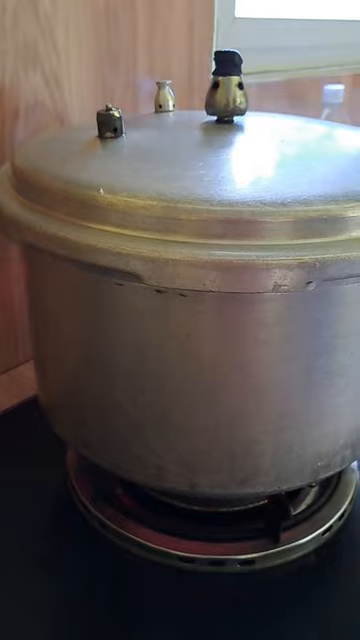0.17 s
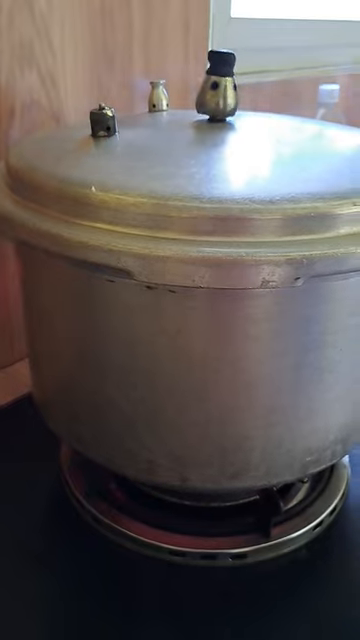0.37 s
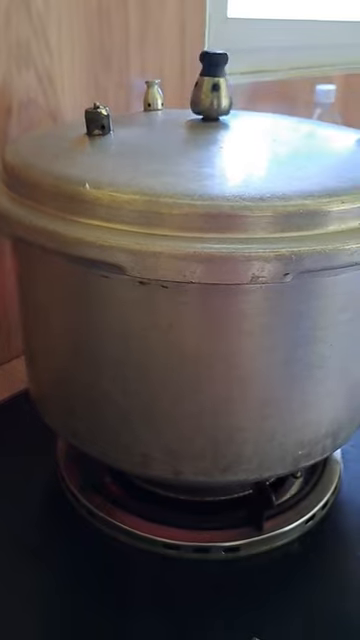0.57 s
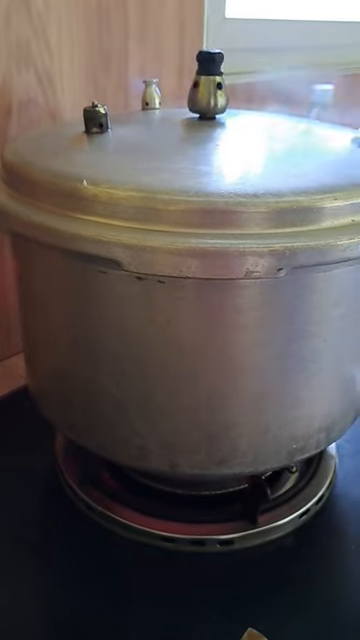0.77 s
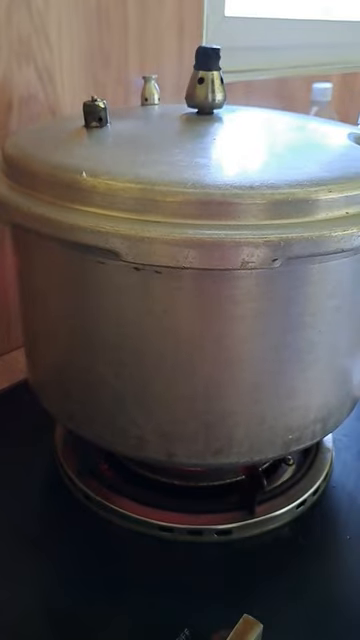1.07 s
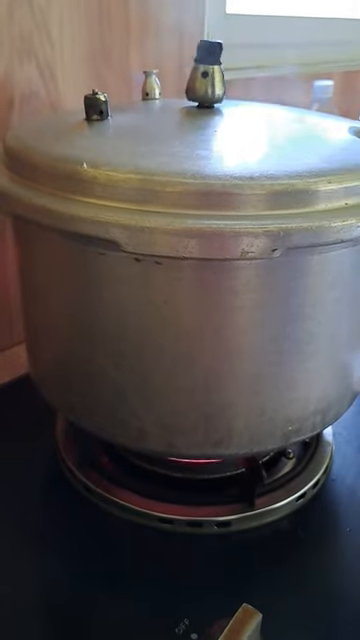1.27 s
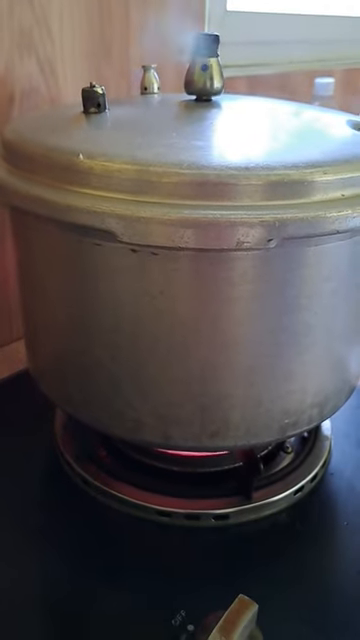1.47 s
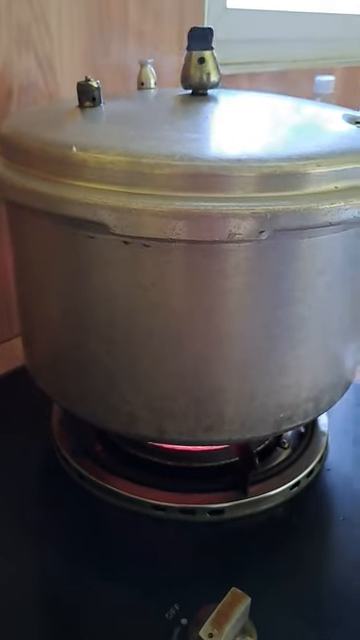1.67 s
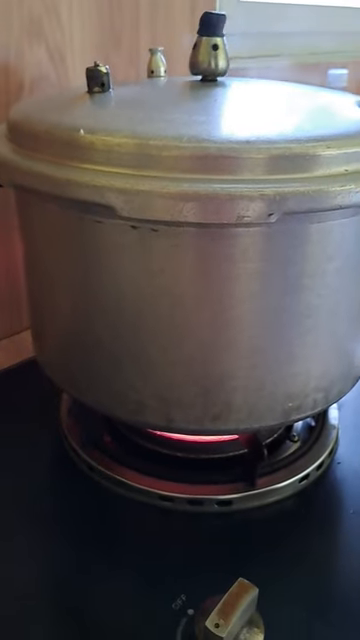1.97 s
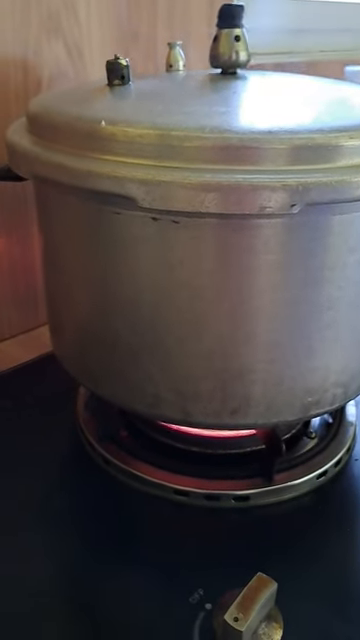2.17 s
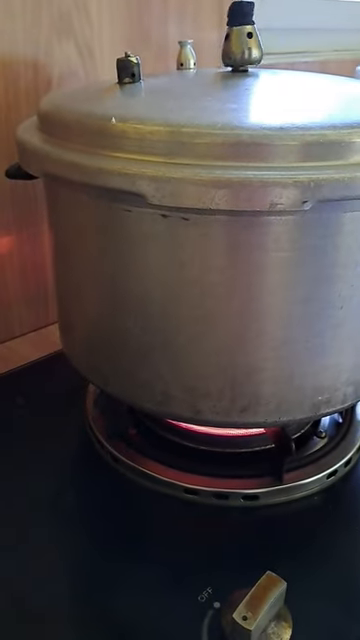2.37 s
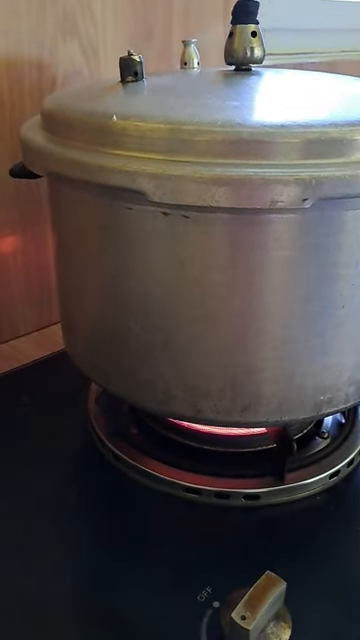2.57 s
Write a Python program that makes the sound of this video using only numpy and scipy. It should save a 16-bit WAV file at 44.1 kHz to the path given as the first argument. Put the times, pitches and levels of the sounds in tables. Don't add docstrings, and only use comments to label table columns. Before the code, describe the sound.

A pressure cooker vents bright, airy steam close to a stereo microphone. Broad overlapping puffs become shorter, more distinct spurts over a constant leak, with short kitchen reflections and a very quiet low burner rumble and appliance hum.

```python
import sys
import numpy as np
from scipy import signal
from scipy.fft import rfft, irfft
from scipy.io import wavfile

SR = 44100
rng = np.random.default_rng(int(sys.argv[2]) if len(sys.argv) > 2 else 0)


def wrap_up_sound(samples):
    columns = np.atleast_2d(samples).T
    tamed = np.clip(columns, -1, 1)
    steps = np.round(tamed * 32767).astype(np.int16)
    wavfile.write(sys.argv[1], SR, steps)


def to_linear_factor(level_db):
    exponent = np.asarray(level_db, float) / 20
    return 10 ** exponent


N = 120393
HZ = np.maximum(np.fft.rfftfreq(N, 1 / SR), 10)

# centre_s, level_db, half_length_s, aim (-1 away .. 1 toward), vent_ring_db
PUFFS = [(0.005, -26, 0.088, 0, -3), (0.237, -25, 0.07, 0.33, 1), (0.362, -24, 0.062, -0.22, -3),
         (0.543, -22, 0.04, 0.24, 2.5), (0.599, -20.5, 0.044, -0.33, 0.8), (0.781, -21, 0.035, 0.46, 1),
         (0.871, -23.5, 0.038, 0.1, -1.5), (0.952, -28, 0.051, 0.4, 1.5), (1.083, -20.5, 0.026, 0.43, 1.5),
         (1.149, -23, 0.028, -0.2, -5), (1.332, -18.5, 0.026, 0.2, 2), (1.443, -26, 0.018, 0.6, 3.5),
         (1.581, -22.5, 0.03, .2, 1), (1.647, -29.5, 0.031, 0.6, 5), (1.79, -23.5, 0.028, 0.61, 5),
         (1.84, -23.5, 0.041, 0.02, -3), (2.041, -20, 0.029, 0.58, 4.5), (2.172, -25.5, 0.035, 0.76, 2.5),
         (2.293, -21.5, 0.032, 0.72, 1.5), (2.363, -23, 0.022, 0.43, -3), (2.491, -20, 0.017, 0.7, -5),
         (2.527, -21.5, 0.033, -0.25, -1.5), (2.595, -22, 0.027, -0.1, -2), (2.74, -26, 0.034, 0.7, 1)]
# pitch_hz, level_db per Hz
JET_SPECTRUM = [(300, -31), (900, -20.5), (2650, -13.5), (5800, -4.5), (7700, 0.7), (9800, -7.5),
                (12300, 0), (15400, -1.5)]
# pitch_hz, left_minus_right_db
JET_BALANCE = [(700, 1), (2400, -3), (5500, -2.5), (7600, -2.5), (10000, 8), (12500, 3.5), (15500, 0.5)]
# pitch_hz, level_db at full aim
AIM_TILT = [(800, -6), (4000, -2.5), (8000, -2.5), (13000, 0.5)]
# pitch_hz, left_minus_right_db at full aim
AIM_PAN = [(2000, 7), (8000, 1), (14000, 9.5)]
# pitch_hz, share (0 .. 1)
DIRECT_SHARE = [(300, .7), (800, 0.45), (1500, 0.6), (2000, 0.25), (3500, 0.12), (4500, 0.22), (7400, 0.45),
                (15000, 0.12)]
# pitch_hz, share (0 .. 1)
ROOM_SHARE = [(800, 0.83), (4000, 0.3), (14000, 0.2)]
# pitch_hz, level_db per Hz
FLAME_SPECTRUM = [(25, -10), (80, -12.5), (115, -5.5), (165, -9.5), (215, -0.3), (260, -8), (450, -7.5),
                  (900, -26)]
# pitch_hz, likeness (0 .. 1)
FLAME_ALIKE = [(50, .45), (150, 0.73), (300, 0.7), (700, 0.13)]
# pitch_hz, level_db, width_hz
HUM_TONES = [(152, -60, 3.2), (468, -63.5, 1.1), (300.3, -70, 4), (225.6, -64.5, 2.8), (211.6, -62.5, 10),
             (180, -71.5, 4.4), (375.6, -70.5, 3)]


def rms_one(x):
    return x / np.sqrt(np.mean(x ** 2))


def at_hz(points, hz):
    pitch_hz, value = np.array(points).T
    return np.interp(np.log(hz), np.log(pitch_hz), value)


def drift(per_s):
    r = np.exp(-2 * np.pi * per_s / SR)
    settle = 8000
    noise = rng.standard_normal(N + settle)
    return rms_one(signal.lfilter([1], [1, -2 * r, r * r], noise)[settle:])


def colour(x, gain):
    return irfft(rfft(x) * gain, N)


def valve():
    leak_power, leak_aim = to_linear_factor(2 * -29.5), 0.11
    centre_s, level_db, half_s, aim, ring_db = np.array(PUFFS).T[:, :, None]
    t = np.arange(N) / SR
    power = to_linear_factor(2 * level_db) * np.exp(-((t - centre_s) / half_s) ** 2)
    total = power.sum(axis=0) + leak_power
    mean_aim = ((power * aim).sum(axis=0) + leak_power * leak_aim) / total
    mean_ring_db = (power * ring_db).sum(axis=0) / total
    return total, mean_aim, mean_ring_db


def lid():
    width_hz, level_db, waver_db, waver_per_s = 170, 3.0, 4.0, 3.0
    rings = 0
    for hz in (2330, 2580, 2800):
        ring = colour(rng.standard_normal(N), np.exp(-((HZ - hz) / width_hz) ** 2))
        rings = rings + rfft(ring * to_linear_factor(level_db + waver_db * drift(waver_per_s)))
    return rings * [[1], [-1]]


def echoes():
    echo_db, t60_s, start_s = -9, 0.15, 0.008
    t = np.arange(N) / SR
    tail = rng.standard_normal((2, N)) * to_linear_factor(-60 * t / t60_s) * (t > start_s)
    tail *= to_linear_factor(echo_db) / np.sqrt(np.sum(tail[0] ** 2))
    return (1 + rfft(tail)) / np.sqrt(1 + to_linear_factor(2 * echo_db))


def jet_noise():
    lag_s = 10 / 44100
    alike = np.clip(at_hz(DIRECT_SHARE, HZ), 0, 1)
    white = rfft(rng.standard_normal((3, N)))
    shared = white[0] * np.sqrt(alike)
    separate = white[1:] * np.sqrt(1 - alike)
    return separate + shared * np.exp(-2j * np.pi * HZ * [[0], [lag_s]])


def steam():
    room_t60_s, vent_hz, vent_octaves = 0.35, 8500, 0.14
    power, aim, ring_db = valve()
    keep = to_linear_factor(-120 / (room_t60_s * SR))
    sputter_db = 0.05 * drift(1900) + 0.57 * drift(34)
    source = jet_noise() + lid()
    out, step = 0, 1 / 3
    for hz in 250 * 2 ** np.arange(0, 6.2, step):
        octaves_off = np.clip(np.log2(HZ / hz) / step, -1, 1)
        band = irfft(source * np.cos(np.pi / 2 * octaves_off) ** 2, N)
        near = np.log2(hz / vent_hz) / vent_octaves
        fresh_db = aim * at_hz(AIM_TILT, hz) + ring_db * np.exp(-near ** 2 / 2)
        fresh = power * to_linear_factor(2 * fresh_db)
        linger = signal.lfilter([1 - keep], [1, -keep], fresh, zi=[fresh[0] * keep])[0]
        share = np.clip(at_hz(ROOM_SHARE, hz), 0, 1)
        pan = to_linear_factor(aim * at_hz(AIM_PAN, hz) * [[1], [-1]])
        direct = (1 - share) * fresh * pan * to_linear_factor(2 * sputter_db)
        level = np.sqrt(direct + share * linger)
        out = out + band * level * to_linear_factor(1.62 * drift(7.2))
    gain_db = at_hz(JET_SPECTRUM, HZ) + at_hz(JET_BALANCE, HZ) * [[0.5], [-0.5]] + 7.5
    return colour(out, to_linear_factor(gain_db) * echoes())


def flame():
    level_db, flicker_db, flicker_per_s = -58, 3, 3.6
    mid, side = rfft(rng.standard_normal((2, N)))
    alike = np.clip(at_hz(FLAME_ALIKE, HZ), 0, 1)
    both = np.sqrt(1 + alike) * mid + np.sqrt(1 - alike) * side * [[1], [-1]]
    roar = irfft(both * to_linear_factor(at_hz(FLAME_SPECTRUM, HZ)) / (1 + (HZ / 1200) ** 4), N)
    return rms_one(roar) * to_linear_factor(level_db + flicker_db * drift(flicker_per_s))


def hum():
    t = np.arange(N) / SR
    out = 0
    for hz, level_db, width_hz in HUM_TONES:
        strength = to_linear_factor(level_db + 0.5 + 2.2 * drift(width_hz))
        out = out + strength * np.sin(2 * np.pi * hz * t + 0.55 * drift(width_hz))
    return out


def scene():
    return steam() + flame() + hum()


def top_cut(x):
    return signal.sosfilt(signal.butter(12, 15900, fs=SR, output="sos"), x)


def record(dry):
    low_pass = signal.ellip(12, 0.1, 70, 15470, fs=SR, output="sos")
    mix = signal.sosfiltfilt(low_pass, dry)
    return top_cut(mix)


dry = scene()
out = record(dry)
wrap_up_sound(out)
```